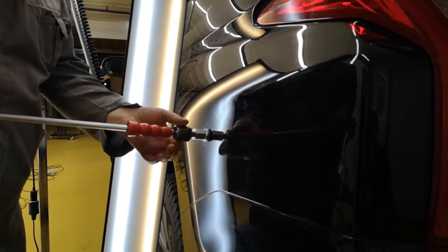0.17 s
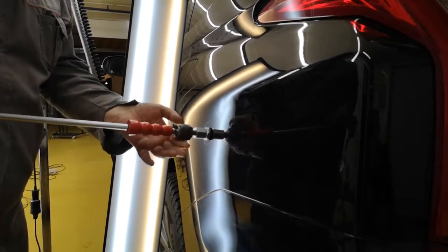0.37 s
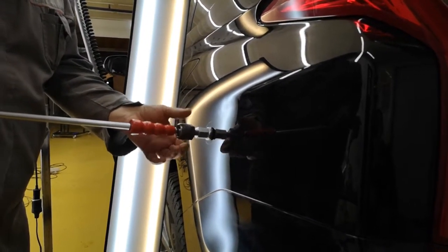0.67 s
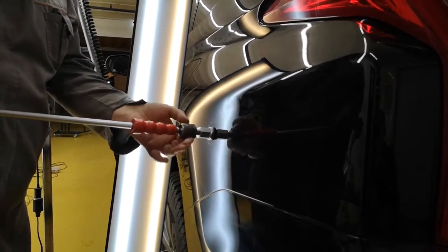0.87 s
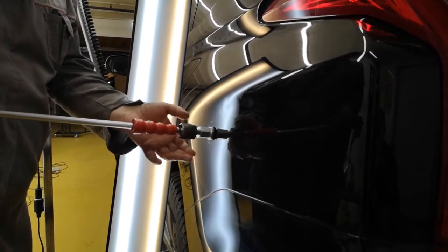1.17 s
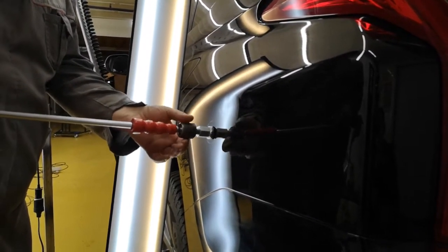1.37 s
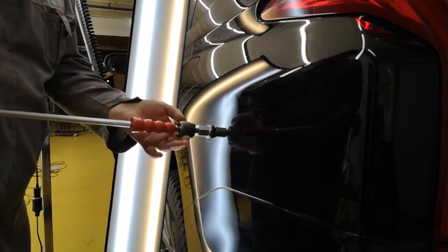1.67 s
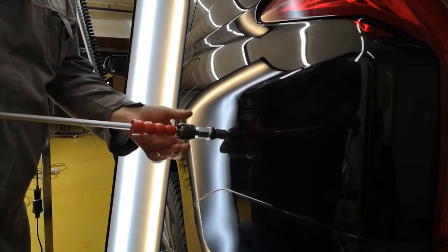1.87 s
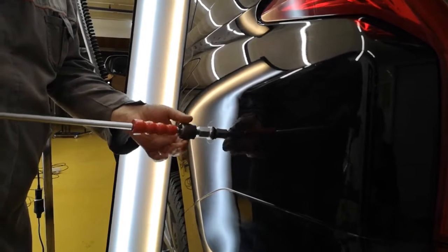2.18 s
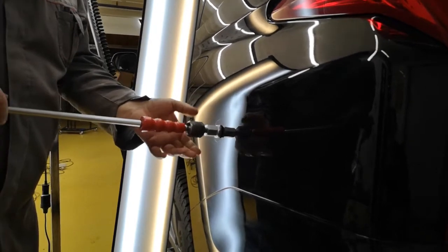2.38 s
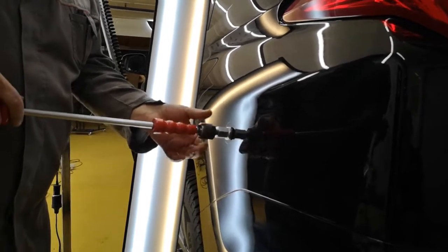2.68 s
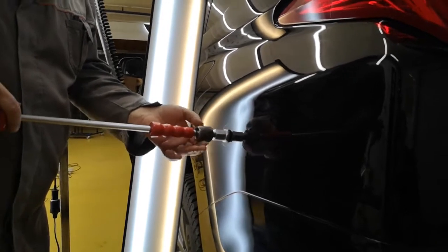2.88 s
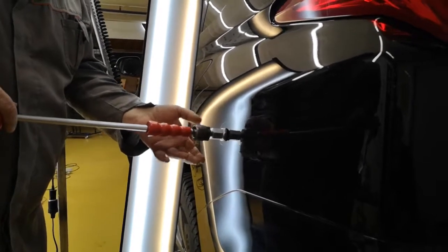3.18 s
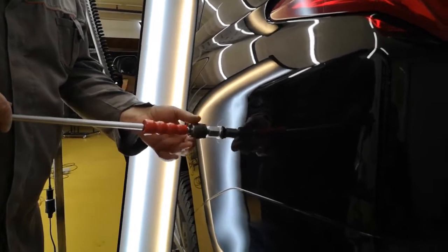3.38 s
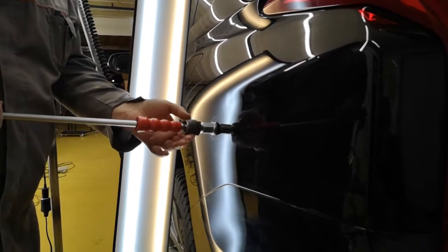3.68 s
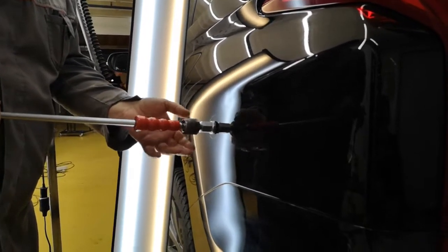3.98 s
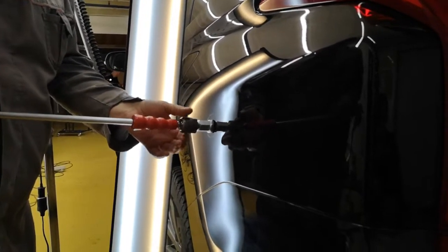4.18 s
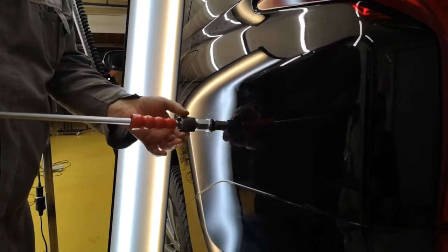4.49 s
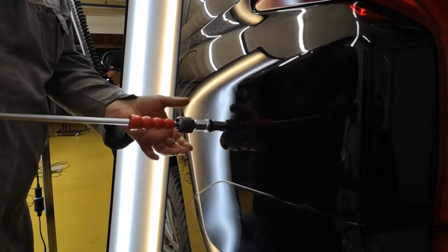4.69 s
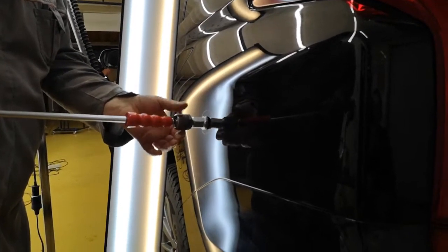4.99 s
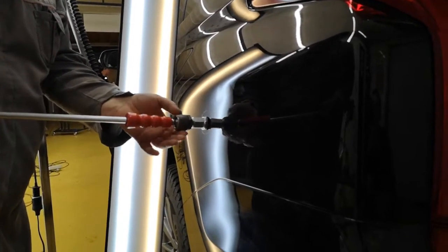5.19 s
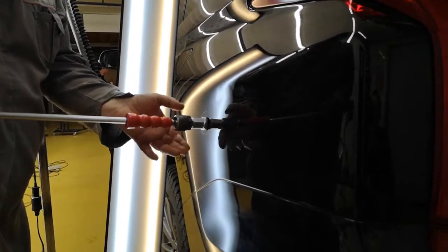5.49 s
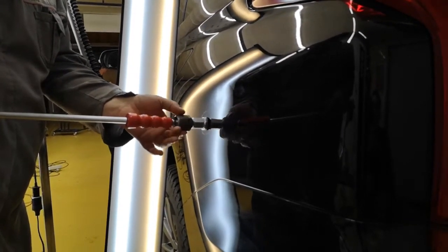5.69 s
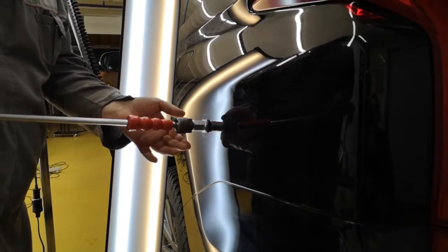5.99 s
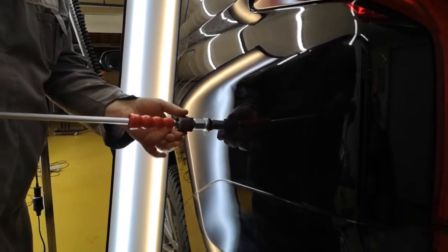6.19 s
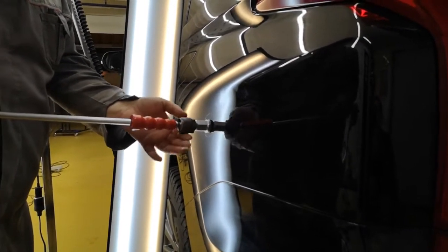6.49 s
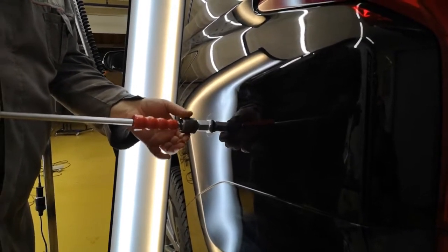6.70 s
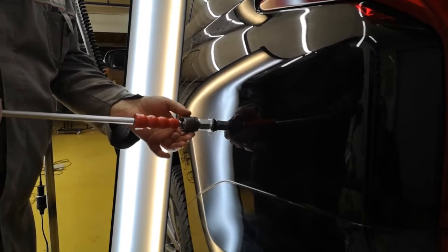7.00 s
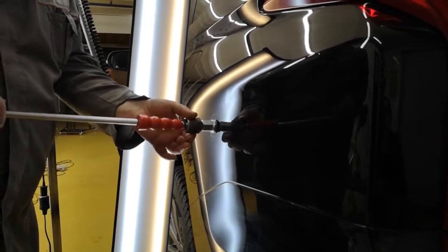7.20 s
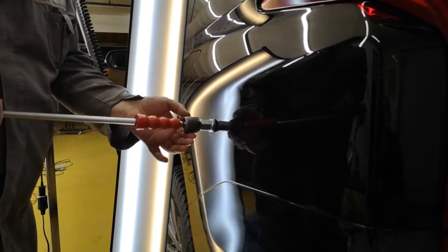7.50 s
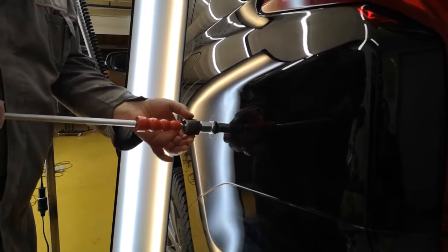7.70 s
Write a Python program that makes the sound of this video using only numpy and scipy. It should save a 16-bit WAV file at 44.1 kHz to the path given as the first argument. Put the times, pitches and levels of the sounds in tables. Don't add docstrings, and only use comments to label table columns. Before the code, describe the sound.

Irregular booming steel knocks on a car panel in a bare workshop, cloth rustling nearby, then steady ringing hammer blows further off.

```python
import sys
import numpy as np
from scipy import signal
from scipy.fft import rfft, irfft
from scipy.io import wavfile
from scipy.ndimage import uniform_filter1d

SR = 44100
rng = np.random.default_rng(int(sys.argv[2]) if len(sys.argv) > 2 else 0)


def master(y):
    cut = np.clip(np.atleast_2d(y).T, -1, 1)
    pcm = np.round(cut * 32767)
    wavfile.write(sys.argv[1], SR, pcm.astype(np.int16))


def gain_from_db(level_db):
    decades = np.asarray(level_db, float) / 20
    return 10 ** decades


N = 345744

# (frequency [Hz], t60 [s])
NEAR_DECAY = [(60, 0.79), (160, 0.64), (420, 0.67), (1100, 0.59), (2900, 0.47), (5500, 0.67), (8000, 0.49),
              (15000, 0.56)]
# (frequency [Hz], coherence [0-1])
COHERENCE = [(90, 1), (150, 1), (300, 0.89), (600, 0.48), (2000, 0.12), (12000, 0.043)]
# (frequency [Hz], level [dB])
ROOM_TONE = [(35, -31), (60, 2), (76, -2), (221, -12.5), (630, -22.5), (1000, -20), (1460, -21),
             (2610, -26.5), (6310, -34), (7600, -42), (10500, -39.5), (14600, -38.5), (15600, -52.5)]
# (frequency [Hz], level [dB])
SCRAPE_COLOUR = [(250, -3), (600, -2), (1500, -10), (3000, -12), (5500, -23), (9000, -37)]


def evened(x):
    return x / np.sqrt(np.mean(x ** 2) + 1e-20)


def read(points, hz):
    f, value = np.transpose(points)
    return np.interp(np.log(hz + 1), np.log(f + 1), value)


def add(mix, s, sound):
    part = mix[round((s + 1) * SR):][:len(sound)]
    part += sound[:len(part)]


def pair(length, gain, same, size=512):
    hop = size // 4
    frames, hz = length // hop + 5, np.fft.rfftfreq(size, 1 / SR)[:, None]
    a, b, c, d = rng.standard_normal((frames, len(hz), 4)).T
    like = np.clip(same(hz), 0, 1)
    left = a + 1j * b
    right = like * left + np.sqrt(1 - like ** 2) * (c + 1j * d)
    z = np.array([left, right]) * gain(hz, np.arange(frames) * hop / SR)
    return signal.istft(z, nperseg=size, noverlap=size - hop)[1][:, :length]


def strokes(rows, rise_db_s, fall_db_s):
    t = np.arange(0, N + 32, 32) / SR
    power = 0
    for s, hold, db in rows:
        before, after = np.maximum(s - t, 0), np.maximum(t - s - hold, 0)
        power = power + gain_from_db(2 * (db - rise_db_s * before - fall_db_s * after))
    return np.interp(np.arange(N) / SR, t, np.sqrt(power))


def strike(colour, slope_db, modes, uneven_db):
    hz, knots = abs(np.fft.fftfreq(16384, 1 / SR)), np.geomspace(60, 16000, num=70)
    chance_db = uneven_db * np.interp(hz, knots, rng.standard_normal(len(knots)))
    tilt_db = slope_db * np.log2((hz + 200) / 1500)
    broad = gain_from_db(read(colour, hz) + tilt_db + chance_db)
    lift = 1 + sum(gain_from_db(2 * db) / (1 + (2 * (hz - f) / width) ** 2) for f, width, db in modes)
    log_gain = np.log(broad * np.sqrt(lift) + 1e-6)
    sound = np.fft.ifft(np.exp(log_gain - 1j * signal.hilbert(log_gain).imag)).real[:8192]
    return sound / np.linalg.norm(sound)


def hall(dry, rise, first_db, decays, stretch=1, bass_hz=150):
    def gain(hz, t):
        rise_s = rise * (1 + bass_hz / (hz + 80))
        build = gain_from_db(first_db) + 1 - np.exp(-(t / rise_s) ** 2)
        return build * gain_from_db(-60 * t / (stretch * read(decays, hz)))
    tail = pair(SR, gain, lambda hz: read(COHERENCE, hz), size=256)
    spectrum = rfft(tail)
    fine, coarse = (uniform_filter1d(abs(spectrum) ** 2, size=n, axis=1) for n in (90, 1500))
    tail = irfft(spectrum * np.sqrt(abs(coarse / fine)), SR)
    tail = tail * np.minimum(np.arange(SR) / 130, 1)
    tail = tail * np.clip(np.linspace(8, -1, num=SR), 0, 1)
    tail = tail / np.linalg.norm(tail, axis=1, keepdims=True) * np.sqrt(.09 * SR)
    return signal.fftconvolve(dry[None], tail, axes=1)[:, SR:SR + N]


def hiss():
    top = signal.butter(4, 10000, "highpass", fs=SR, output="sos")
    return gain_from_db(-85) * signal.sosfilt(top, rng.standard_normal((N, 2)).T)


def air():
    # (start [s], hold [s], level [dB])
    lurches = [(0., 0.0066, -56), (.55, 0.018, -51), (.85, 0.023, -44), (1.4, .05, -50.5),
               (1.92, 0.15, -56), (2.15, 0.045, -49), (2.45, 0.023, -48.5), (2.7, .1, -47), (3.3, .04, -53),
               (3.62, 0.069, -50.5), (4.26, 0.016, -51), (4.57, 0.04, -43.5), (4.88, 0.022, -49.5),
               (5.65, 0.028, -51), (6.35, 0.42, -45), (7.1, 0.38, -51), (7.55, .1, -49)]
    tone_db, rest_db = -65.1, -62.5
    patches = rng.standard_normal((N // 256 + 5, 513)).T
    patches = uniform_filter1d(patches, size=20, axis=0)
    patches = evened(uniform_filter1d(patches, size=12, axis=1))
    tone = pair(N, lambda hz, s: gain_from_db(read(ROOM_TONE, hz) + 2.2 * patches),
                lambda hz: read(COHERENCE, hz), size=1024)
    band = signal.butter(3, [12, 34], "bandpass", fs=SR, output="sos")
    low = signal.sosfilt(band, rng.standard_normal(N))
    lurch = gain_from_db(rest_db) + strokes(lurches, rise_db_s=112.5, fall_db_s=94)
    return gain_from_db(tone_db) * evened(tone) + evened(low) * lurch


def rustle(grain_db):
    # (start [s], hold [s], swish [dB], scrape [dB])
    sleeve = [(.21, 0.028, -63, -60.5), (0.396, .05, -74, -60.5), (0.648, 0.024, -68.5, -64),
              (1.1, 0.0087, -75, -87.5), (1.203, 0.062, -61, -84.5), (1.395, 0.076, -71, -77),
              (1.483, 0.0337, -63.5, -78), (1.794, 0.099, -66, -87), (1.899, 0.023, -61, -61.5),
              (2.048, 0.037, -73, -84), (2.294, 0.088, -51.5, -52.5), (2.428, 0.03, -58.5, -69),
              (3.03, 0.031, -69.5, -70.5), (3.102, 0.21, -71, -62), (3.436, 0.081, -75, -65.5),
              (3.893, 0.035, -62.5, -69), (4.141, 0.09, -66.5, -55.5), (4.224, 0.017, -61, -46),
              (4.307, 0.047, -69, -53), (4.817, .02, -72, -81), (4.922, .1, -77, -69),
              (5.144, 0.046, -75, -81), (5.34, 0.022, -79, -79), (5.387, 0.024, -66, -63),
              (5.466, .04, -80, -64)]
    # (start [s], hold [s], level [dB])
    bumps = [(.07, .03, -54), (.24, 0.036, -58.5), (1.14, 0.024, -74), (1.4, 0.018, -59),
             (1.458, 0.0072, -46.5), (1.68, 0.22, -68), (1.916, .01, -45.5), (2.27, 0.055, -52.5),
             (3.08, 0.024, -52), (3.2, 0.055, -58), (3.37, 0.077, -54.5), (3.9, 0.035, -58),
             (4.14, 0.11, -50), (4.235, 0.011, -46), (4.33, 0.059, -59), (4.9, 0.022, -56),
             (5.0, 0.049, -63), (5.31, .05, -62.5), (5.42, 0.032, -57.5)]
    # (frequency [Hz], level [dB])
    swish_colour = [(2500, -15.5), (4500, -13), (6500, -10.5), (7600, -3), (8600, -13.5), (10000, -20),
                    (15500, -27.5)]
    # (frequency [Hz], level [dB])
    thump_colour = [(50, -20.5), (100, -4), (150, 4), (250, -5.5), (450, -26.5), (900, -47)]
    swish = strokes([(s, hold, db) for s, hold, db, _ in sleeve], rise_db_s=400, fall_db_s=217)
    scrape = strokes([(s, hold, db) for s, hold, _, db in sleeve], rise_db_s=400, fall_db_s=217)
    thump = strokes(bumps, rise_db_s=1500, fall_db_s=295.5)
    out = np.zeros((2, N))
    for level, colour, like, size in [(swish, swish_colour, .3, 256), (scrape, SCRAPE_COLOUR, .4, 256),
                                      (thump, thump_colour, 0.96, 2048)]:
        noise = evened(pair(N, lambda hz, s: gain_from_db(read(colour, hz)) + 0 * s, lambda hz: like + 0 * hz, size=size))
        grains = evened(uniform_filter1d(rng.standard_normal(N), size=300))
        out += noise * evened(gain_from_db(grain_db * grains)) * level
    return out


def ticks():
    # (time [s], level [dB], brightness [dB per octave])
    snaps = [
        (1.456, -48, -1.5),
        (1.914, -49, -13),
        (3.925, -52, 2),
    ]
    dry = np.zeros(N + SR)
    for s, db, slope_db in snaps:
        add(dry, s, gain_from_db(db - 16.5) * strike(SCRAPE_COLOUR, slope_db, [], 0.75))
    return hall(dry, 0.00086, 3, NEAR_DECAY, 0.082)


def squeaks():
    # (time [s], level [dB], start [Hz], end [Hz], length [s])
    slips = [
        (5.363, -43, 3550, 2600, .024),
        (3.882, -69, 4150, 3800, .05),
    ]
    grip = 1.7
    direct_db, left_minus_right_db = 29, -1.5
    dry = np.zeros(N + SR)
    for s, db, start_hz, end_hz, length in slips:
        step_db = 4.5 - 600 * length
        u = np.linspace(0, 1, round(length * SR))
        pitch_hz = end_hz + (start_hz - end_hz) * (1 - u) ** 1.25
        turn = 2 * np.pi * np.cumsum(pitch_hz) / SR
        swell = np.sin(np.pi * u ** grip)
        tone = sum(gain_from_db(step_db * k) * np.sin((k + 1) * turn) * swell ** (k + 2) for k in range(3))
        add(dry, s, gain_from_db(db) * tone / np.linalg.norm(tone))
    sound = hall(dry, 0.0015, 3, NEAR_DECAY, 0.44) + gain_from_db(direct_db) * dry[SR:]
    return sound * gain_from_db(left_minus_right_db * np.array([[.5], [-.5]]))


def far_hammer():
    # (time [s], level [dB], spot on the sheet [0-1], high head mode [dB])
    beats = [
        (5.54, -32, 0.09, -7),
        (5.787, -27.5, 0.2, 17.5),
        (6.03, -20, .2, 9.8),
        (6.267, -19, 0.26, 10),
        (6.502, -19.5, 0.44, 11.5),
        (6.745, -19.5, 0.48, 22),
        (6.994, -21, .7, 22),
        (7.249, -21, 0.71, 10),
        (7.501, -20.5, 0.94, 15.5),
        (7.746, -20, .99, 14.5),
    ]
    # (spot [0-1], thud [dB], low head mode [dB], middle head mode [dB])
    spots = np.transpose([(0, 4, 21.5, 1), (.22, 4, 26.5, 5), (.6, -1.5, 25, 32), (.78, 2.5, 21.5, 27),
                          (1, 2, 18.5, 30)])
    # (frequency [Hz], level [dB per Hz])
    sheet_colour = [(35, -73), (60, -23), (132, -11.5), (179, -4), (313, -11.5), (352, 0), (395, -8),
                    (561, 3), (645, -5.5), (1640, -19.5), (2370, -10), (4450, -20.5), (5890, -24),
                    (7260, -15.5), (15600, -49.5)]
    # (frequency [Hz], width [Hz])
    head = [(5040, 95), (5945, 85), (7050, 75)]
    # (frequency [Hz], width [Hz], level [dB])
    shell = [(192, 27, 9.5), (257, 34, 7.5), (352.3, 12, 2.5), (525, 16, -2), (568, 23, -1)]
    # (frequency [Hz], width [Hz], level [dB])
    tin = [(982, 140, 8), (1450, 33, 10.5), (2024, 45, 9), (2420, 135, 6), (2438, 48, 3.5), (2760, 120, 6),
           (3370, 30, 12), (4174, 91, 7.5), (4930, 87, -18.5), (5790, 180, 20), (5480, 74, 19),
           (7650, 80, -8), (7800, 37, 14)]
    # (frequency [Hz], t60 [s])
    far_decay = [(60, 0.71), (200, 0.44), (420, 0.98), (900, 0.69), (2400, 0.46), (5500, 0.56),
                 (8000, 0.39), (15000, 0.73)]
    lowpass = signal.butter(2, 700, fs=SR)
    dry = np.zeros((2, N + SR))
    for k, (s, db, spot, high_db) in enumerate(beats):
        thud_db, low_db, middle_db = (np.interp(spot, spots[0], row) for row in spots[1:])
        drift = 1 + .006 * rng.standard_normal((2, len(head)))
        modes = [(f, w, d + thud_db) for f, w, d in shell] + tin
        for (f, w), d, first, twin in zip(head, (low_db, middle_db, high_db), *drift):
            modes += [(f * first, w, d), (f * twin * 1.012, w, d - 4)]
        blow = gain_from_db(db - 1.5) * strike(sheet_colour, .01, modes, 2.6)
        bass = signal.filtfilt(*lowpass, blow)
        turn = 1.1 * k
        add(dry[0], s, bass + np.cos(turn) * (blow - bass))
        add(dry[1], s, np.sin(turn) * (blow - bass))
    return sum(hall(path, 0.013, -12.5, far_decay, bass_hz=41) for path in dry)


def slide_hammer():
    # (time [s], level [dB], brightness [dB per octave], panel boom [dB])
    first = [
        (-0.22, -18, 2, -11),
    ]
    pulls = [
        (0.723, -14, 2.14, -1.5),
        (2.512, -14, 1.82, -6),
        (3.479, -18, 1.5, -9.5),
        (4.441, -16, 1.5, -4),
        (5.811, -14, 1.5, -9.5),
    ]
    returns = [
        (0.397, -28.5, 5.5, 3),
        (2.157, -36, 2.5, -20),
        (3.135, -32, 2.4, -27),
        (4.12, -35, 4.1, -11),
        (5.477, -41.5, 3.6, -11),
    ]
    # (frequency [Hz], level [dB per Hz])
    knock_colour = [(24, -49.5), (40, -28), (60, -16), (114, -12.5), (136, -12), (267, -6), (408, -5.5),
                    (1390, -11), (1610, -18.5), (2720, -16.5), (3160, -22), (3500, -21), (8590, -29.5),
                    (10200, -33.5), (15600, -51.5)]
    # (frequency [Hz], level [dB per Hz])
    slide_colour = [(35, -52.5), (60, -17), (156, -8), (248, 8), (630, 3.5), (1080, 1.5), (1240, -6),
                    (2210, -13), (2610, -13.5), (2930, -21.5), (8160, -38), (10100, -40.5), (15600, -55)]
    # (frequency [Hz], width [Hz], level [dB])
    rod = [(231, 95, -10), (897, 120, -0.5), (1073, 30, 8.5), (1411, 35, -1), (1730, 190, -14),
           (2630, 550, -6), (3580, 120, 7.5), (4150, 210, -16), (5020, 100, -16.5), (5400, 86, -15),
           (5660, 37, -23), (6930, 180, -24)]
    # (frequency [Hz], width [Hz], level [dB])
    boom = [(67.5, 9, 17), (109, 15, 15.5)]
    dry = np.zeros(N + SR)
    for colour, rows in [(knock_colour, first + pulls), (slide_colour, returns)]:
        for s, db, slope_db, boom_db in rows:
            modes = [(f, w, 7.14 + 0.12 * d) for f, w, d in rod]
            modes += [(f, w, d + boom_db) for f, w, d in boom]
            add(dry, s, gain_from_db(db - 4.5) * strike(colour, slope_db, modes, 1.9))
    return hall(dry, 0.029, -8.0, NEAR_DECAY, 1.028)


def suppressor(x, knee_db, slope, most_db):
    hz, _, z = signal.stft(x, SR, nperseg=512, noverlap=384)
    power = uniform_filter1d((abs(z) ** 2).mean(0), size=45, axis=0)
    power = uniform_filter1d(power, size=7, axis=1)
    threshold_db = knee_db + .75 * read(ROOM_TONE, hz)[:, None]
    under_db = np.clip(threshold_db - 10 * np.log10(abs(power) + 1e-16), 0, None)
    cut_db = np.minimum(slope * under_db, most_db)
    return signal.istft(z / gain_from_db(cut_db), nperseg=512, noverlap=384)[1][:, :N]


def starved(x, under_db, step_db, spread_db):
    hz, _, z = signal.stft(x, SR, nperseg=2048, noverlap=1024, window="cosine")
    power = uniform_filter1d((abs(z) ** 2).mean(0), size=3, axis=1)
    line_db, band_db = (10 * np.log10(abs(uniform_filter1d(power, size=n, axis=0)) + 1e-16) for n in (5, 41))
    chance = uniform_filter1d(rng.standard_normal((z.shape[2], 33)), size=3, axis=0).T
    chance_db = spread_db * chance[np.arange(len(hz)) // 32]
    top_db = band_db[20:].max(0)
    poor = (band_db < top_db - under_db) & (hz[:, None] > 8300) & (top_db > -69)
    asked_db = step_db + chance_db + .09 * (top_db + 45) + 3 * (hz[:, None] > 15150)
    keep = np.where(poor & (line_db < band_db + asked_db), gain_from_db(-37), 1)
    return signal.istft(z * keep, nperseg=2048, noverlap=1024, window="cosine")[1][:, :N]


def scene():
    struck = slide_hammer() + far_hammer() + squeaks()
    trimmed = suppressor(struck, knee_db=-46.5, slope=1.2, most_db=6)
    return trimmed + ticks() + rustle(0.93) + air() + hiss()


def top_cut(x):
    return signal.sosfilt(signal.butter(12, 15800, fs=SR, output="sos"), x)


def record(dry):
    # (frequency [Hz], left minus right [dB])
    side_tilt = [(150, 0.1), (500, 2.), (1100, 1.2), (2200, .2), (4500, 3.5), (9000, 1.1), (14000, .1)]
    lag = np.array([[0], [29]]) / SR
    hz = np.fft.rfftfreq(N, 1 / SR)
    dull_db = 2.6 / (1 + (9500 / (hz + 1)) ** 60)
    lean = gain_from_db(read(side_tilt, hz) * np.array([[.5], [-.5]]) - dull_db)
    late = np.exp(-2j * np.pi * hz * lag * hz ** 2 / (hz ** 2 + 260 ** 2))
    heard = irfft(rfft(dry) * lean * late, N)
    return top_cut(starved(heard, under_db=24.25, step_db=2.3, spread_db=2.2))


dry = scene()
out = record(dry)
master(out)
```